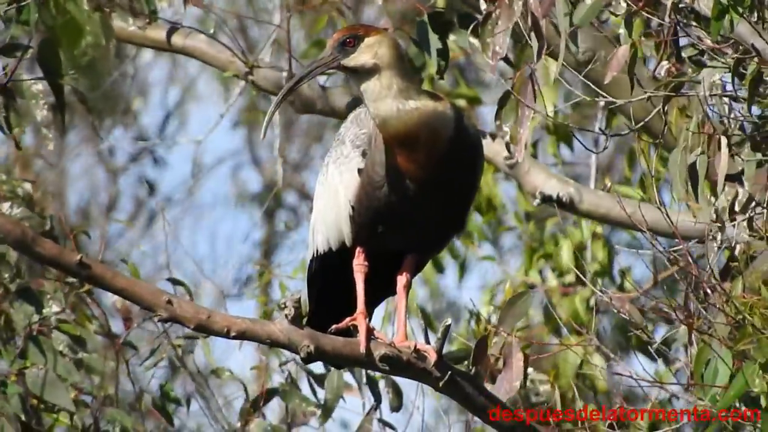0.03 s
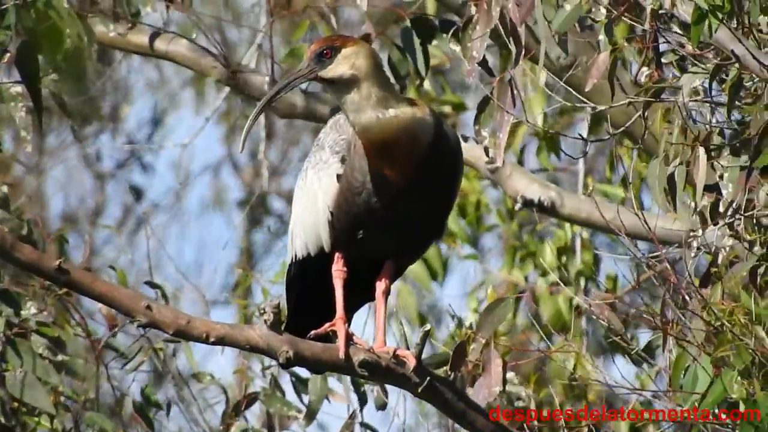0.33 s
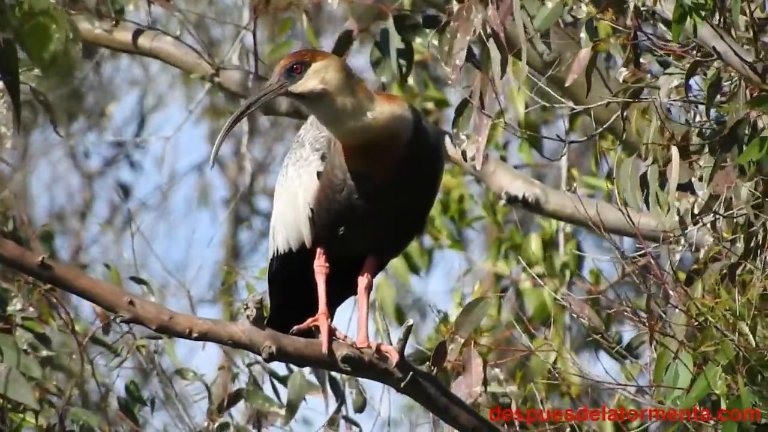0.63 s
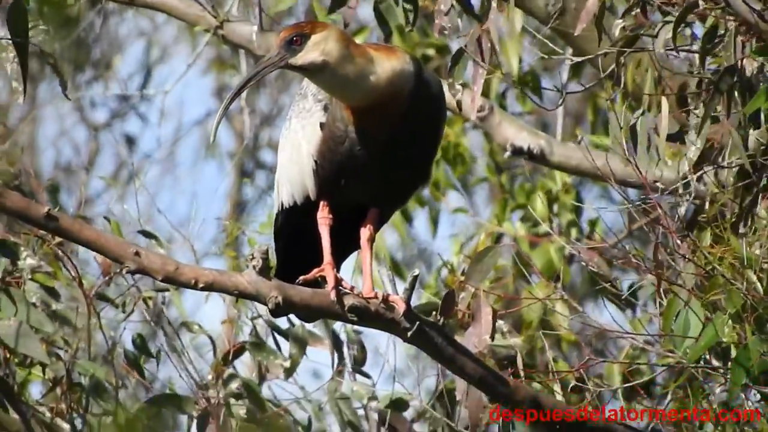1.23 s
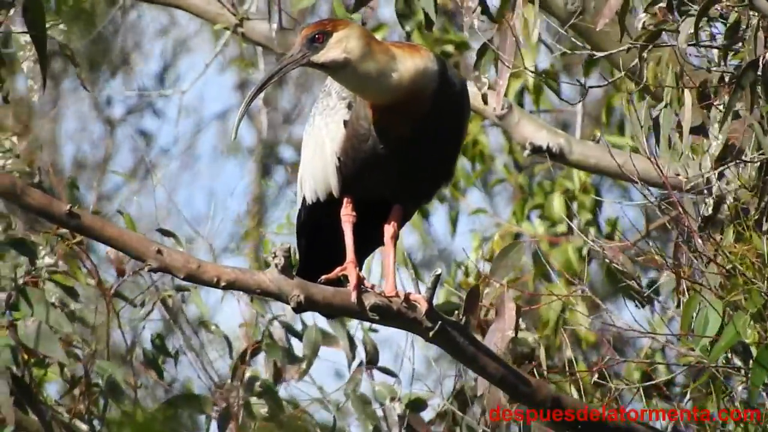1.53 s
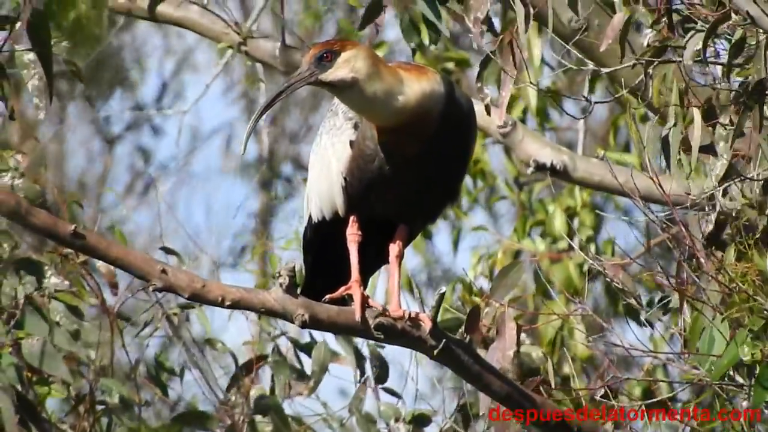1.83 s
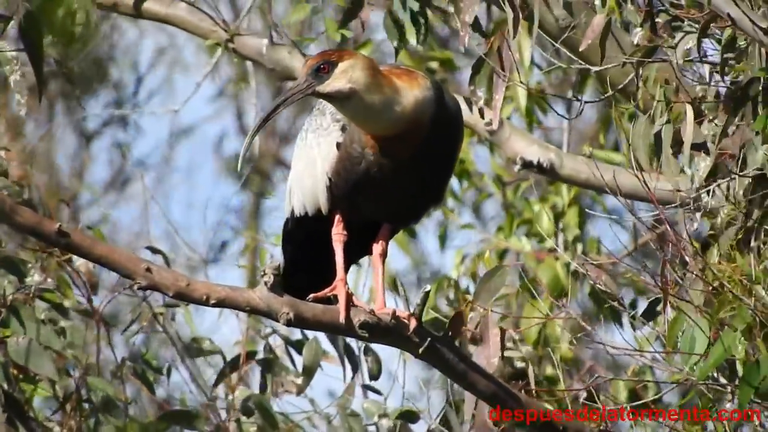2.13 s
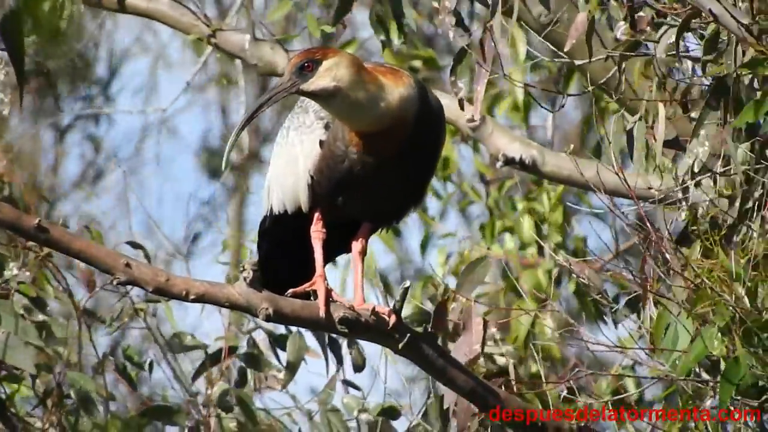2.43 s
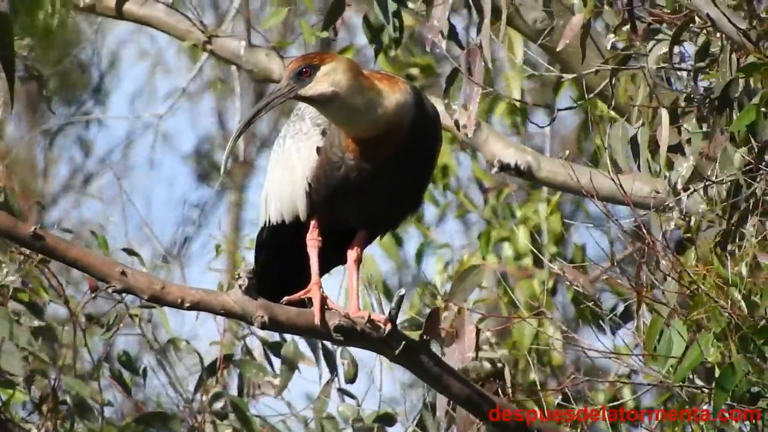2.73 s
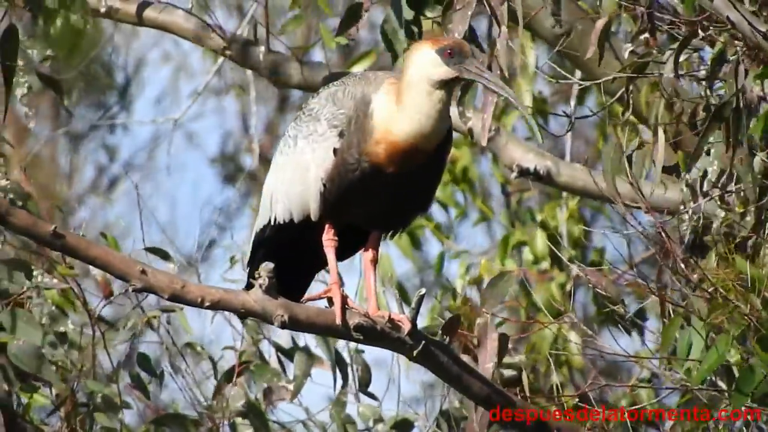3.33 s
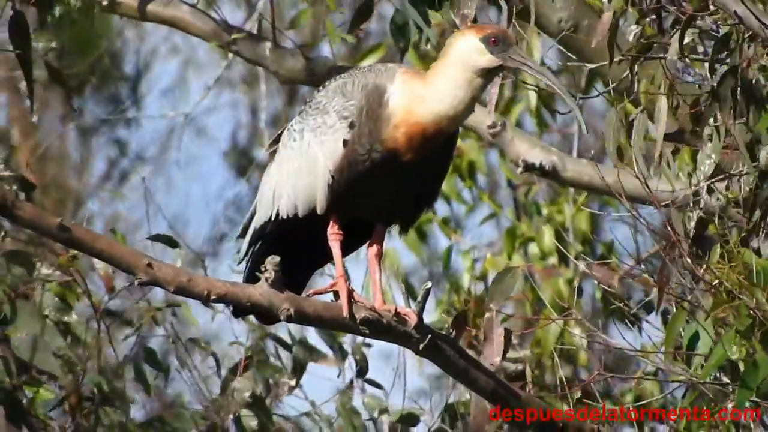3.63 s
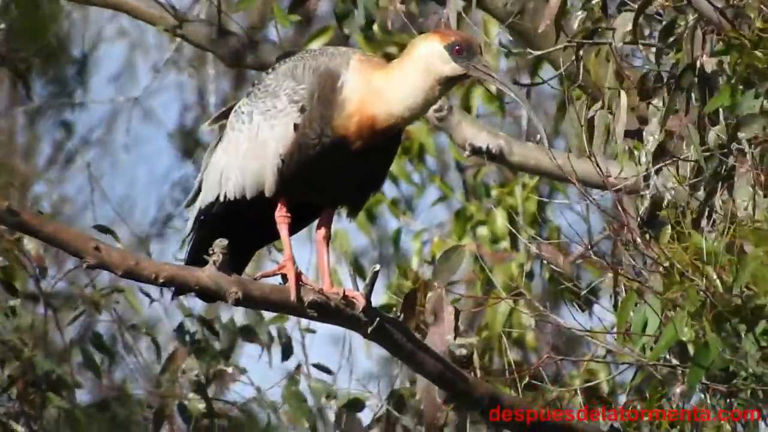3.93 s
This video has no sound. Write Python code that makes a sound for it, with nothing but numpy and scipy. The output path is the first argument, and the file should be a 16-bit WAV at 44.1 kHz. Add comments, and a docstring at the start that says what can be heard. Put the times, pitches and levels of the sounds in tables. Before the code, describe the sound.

Two ibises call harshly throughout in an echoing grove, each about four times a second. A gust bumps the microphone at the start as a small bird gives two falling whistles, then a chip near 0.9 seconds. One ibis honks hoarsely; the other grunts, then brays on two pitches from 1.6 seconds. Wind rumbles and thumps, mostly on the left, from about 2 to 3.3 seconds, then eases.

```python
"""A gust bumps the microphone as a small bird whistles twice and two ibises start calling in an
echoing grove, in turn at first, each about four times a second. One honks, hoarse and rattling, from
syrinx pulses ringing in its throat; the other warms up with grunts while the small bird adds a chip.
From 1.6 s the second ibis brays on two pitches at once, and the pair drift out of step. Gusts build,
buffeting and thumping mostly on the left, and ease towards the end."""
import sys
import numpy as np
from scipy import signal
from scipy.fft import rfft, irfft, next_fast_len
from scipy.io import wavfile
from scipy.ndimage import uniform_filter1d, minimum_filter1d, map_coordinates

SR = 44100
rng = np.random.default_rng(int(sys.argv[2]) if len(sys.argv) > 2 else 0)


def generate_wav(signal):
    """Clip the signal to [-1, 1] and save it as 16-bit WAV at the path in sys.argv[1]."""
    frames = np.transpose(np.atleast_2d(signal))
    scaled = np.clip(frames, -1, 1) * 32767
    pcm = np.round(scaled).astype(np.int16)
    wavfile.write(sys.argv[1], SR, pcm)


N = 176400
T = np.arange(SR // 6) / SR  # time within one call [s]

# First ibis, honk cues; layers are trimmed in the mix
# (time [s], length [s], rattle [dB], held part [dB], rasp [dB], pulse rate [Hz], ringing tone [Hz])
HONK_CUES = [(0.058, 0.035, -40.5, -37, -50, 277.8, 1860), (0.31, 0.033, -31.5, -28.5, -44.5, 259, 1858),
             (0.557, 0.057, -23, -28, -39.5, 267.5, 1910), (0.812, 0.055, -22, -28, -37.5, 264.6, 2004),
             (1.076, 0.064, -22, -27.5, -35.5, 274.7, 2107), (1.353, 0.064, -21, -25.5, -35, 276.5, 2100),
             (1.628, 0.056, -24.5, -36, -35.5, 276.2, 2160), (1.888, 0.058, -25, -33, -38, 274.3, 2126),
             (2.151, 0.072, -25, -35.5, -39, 274.3, 2160), (2.424, 0.074, -29, -36, -40.5, 265.3, 2170),
             (2.698, 0.091, -35, -39, -43, 277.6, 2167), (2.975, 0.067, -26.5, -40, -41.5, 281.8, 2150),
             (3.244, 0.052, -22, -49, -39.5, 280.5, 2050), (3.51, 0.059, -22, -41, -40.5, 279, 2036),
             (3.788, 0.06, -24.5, -33.5, -43.5, 269.2, 2170)]
# Second ibis, warm-up grunts (same columns as the honks)
GRUNT_CUES = [(.225, 0.042, -38, -57, -55, 253.7, 1810), (0.452, .045, -40.5, -40, -48.5, 250.6, 1875),
              (0.681, 0.048, -31.5, -35.5, -46, 264.3, 1980),
              (0.901, 0.065, -34.5, -35.5, -43.5, 266.4, 1913),
              (1.144, 0.059, -27.5, -35, -43, 265.3, 1990)]
# Second ibis, bray cues; layers are trimmed in the mix (time [s], length [s], rattle [dB], tone [dB],
# upper tone [dB], overtones [dB], rasp [dB], pitch [Hz], upper pitch [Hz])
BRAY_CUES = [(1.595, 0.067, -26, -27.5, -45, -38.5, -36, 1993, 2497),
             (1.837, 0.071, -24, -31.5, -39.5, -41, -35.5, 1988, 2499),
             (2.079, 0.07, -23.5, -29, -42, -37.5, -36.5, 1989, 2548),
             (2.316, 0.059, -29, -26.5, -37.5, -37, -51, 2025, 2557),
             (2.565, 0.096, -28, -40, -43.5, -45, -38, 1996, 2539),
             (2.829, 0.096, -35, -33, -46.5, -43.5, -36.5, 1989, 2565),
             (3.076, .084, -26.5, -36, -45.5, -39, -34, 2013, 2550),
             (3.325, 0.086, -24.5, -38, -38.5, -37.5, -31, 1909, 2495),
             (3.571, 0.077, -23, -37, -36.5, -34, -30, 1928, 2469),
             (3.811, 0.074, -23, -37.5, -36, -34.5, -33, 1916, 2417)]
# Throat resonances (frequency [Hz], gain [dB])
THROAT_EQ = [(150, -22.5), (500, -25.5), (1100, -16), (1450, -3), (1670, 3), (1800, -8.5), (1960, 7.5),
             (2080, -1.5), (2250, -2), (2500, -5.5), (2800, -22), (3400, -18), (4200, -21), (6000, -34),
             (12000, -49.5)]
# Nasal peak of the honk (frequency [Hz], gain [dB])
NASAL_EQ = [(3000, -46.5), (3700, -23), (4020, 3.5), (4230, -0.5), (4420, -11), (4800, -20), (6000, -51)]
# Bright edge of the rasp (frequency [Hz], gain [dB])
RASP_EQ = [(1500, -24), (3000, -20), (3750, -10), (4020, -1), (4250, 10), (4600, 8), (5300, 5.5),
           (5950, 16), (6900, -3), (8200, 6), (9200, -8.5), (10300, -5), (12000, -20), (15500, -84)]
# Beak colour on the bray's overtones (frequency [Hz], gain [dB])
BEAK_EQ = [(1500, -13), (3000, -32), (3500, -2), (3750, 1), (3950, 12), (4600, -30.5), (5200, -6.5),
           (5950, -0.5), (6600, -1.5), (7200, -20), (8100, -8.5), (8700, -1), (10400, -9.5), (12000, -43),
           (15500, -42)]
# Small bird, one contour per note (time [s], pitch [Hz], level [dB])
WHISTLE_CONTOURS = [
    [(.012, 4510, -64), (.035, 4570, -37), (.07, 4350, -33.5), (.115, 4154, -46), (.165, 3970, -47),
     (.228, 3726, -48), (.255, 3680, -71)],
    [(.303, 7300, -55), (.328, 6180, -38.5), (.348, 5610, -32.5), (.378, 5000, -38.5), (.415, 4630, -35),
     (.45, 4350, -42), (.465, 4240, -58)],
    [(.92, 4180, -53), (.934, 4880, -31), (.948, 4830, -48)],
]
# Stereo placement of the birds (frequency [Hz], left minus right [dB])
BIRD_PAN = [(200, 7), (700, 7.5), (1300, -4.5), (2300, -6.5), (4200, -0.5), (6000, 3), (14000, 1.5)]
# Grove reverb decay (frequency [Hz], time to fall 60 dB [s])
GROVE_DECAY = [(300, 0.13), (2000, 1), (4000, 0.87), (8000, 0.62), (14000, 0.7)]
# Grove reverb colour (frequency [Hz], gain [dB])
GROVE_EQ = [(300, 2), (1200, -3), (2000, -9), (2600, -4), (4000, -1.5), (6000, 1), (9000, 6), (14000, 2)]
# Stereo image of reverb and air (frequency [Hz], left-right correlation [0-1])
GROVE_LIKENESS = [(100, 0.9), (2000, 0.74), (4000, 0.85), (7000, 0.79), (12000, .1)]
# Gust fader and pan moves (time [s], relative level [dB], left minus right [dB])
GUST_MOVES = [(0.0, -16.5, 29), (0.03, -28, 2), (0.05, -15, 29), (0.31, -54, 7), (0.49, -52.5, 4),
              (0.97, -50, -2), (1.04, -32.5, 10), (1.11, -25, 7.5), (1.16, -28, 5), (1.51, -34.5, 40),
              (1.58, -25.5, 29), (1.63, -34.5, -13), (1.75, -41, 32), (1.78, -21.5, 20), (1.82, -27, 24),
              (1.85, -18, 25), (1.89, -18, -4.5), (2.06, -14.5, 32), (2.12, -21.5, 18), (2.27, -11, 14.5),
              (2.31, -14.5, 7), (2.43, -20, 28), (2.47, -15.5, 12), (2.6, -20.5, 21), (2.63, -11.5, 5.5),
              (2.76, -19.5, 9.5), (3.13, -27, 20), (3.15, -17.5, 26), (3.33, -27.5, 22), (3.38, -26.5, -6),
              (3.43, -32, 4), (3.66, -37, -9.5), (3.69, -49.5, 10), (3.82, -51.5, -6), (3.85, -35.5, 10),
              (3.9, -32.5, -5), (3.95, -26.5, 21), (4.0, -34.5, -9)]
# Low rumble of wind on the microphone (frequency [Hz], gain [dB])
BUFFET_EQ = [(15, -63), (25, -58), (40, -21), (60, 2), (96, 5), (170, 0), (260, -24), (470, -57),
             (1000, -60), (2200, -110)]
# Higher flutter of strong gusts (frequency [Hz], gain [dB])
FLUTTER_EQ = [(100, -3), (220, 11.5), (320, -2), (450, -16.5), (700, -27), (1100, -59), (2500, -75)]
# Hardest blows of wind (time [s], peak [dB], width [s])
THUMP_CUES = [(2.047, -15.5, 0.0015), (2.277, -9.5, 0.00074), (2.369, -8.5, 0.00079),
              (2.618, -12.5, 0.00085), (2.64, -10, 0.0011), (2.676, -12, 0.00065), (2.715, -10, .0012),
              (3.231, -6.5, 0.0013)]
# Rustle cues (time [s], length [s], level [dB])
RUSTLE_CUES = [(.44, 0.08, -37), (.61, 0.04, -39), (.668, 0.039, -39), (.72, 0.035, -39),
               (1.093, 0.13, -43.5), (1.66, 0.067, -41.5)]
# Dull colour of the rustles (frequency [Hz], gain [dB])
RUSTLE_EQ = [(70, -21), (170, 4), (260, -12.5), (400, -16.5), (750, -13), (1400, -23), (3000, -29),
             (9000, -52), (15000, -85)]
# Distant notes (time [s], length [s], pitch [Hz], level [dB])
FAR_NOTE_CUES = [(0, 0.05, 980, -53), (0, 0.05, 766, -56), (0.22, 0.062, 952, -48)]
# Bed of outdoor air (frequency [Hz], gain [dB])
AIR_EQ = [(30, 7.5), (80, 7.5), (180, 7.5), (300, -12), (600, -4.5), (1000, -9), (2000, -2), (3200, -21),
          (5000, -22.5), (9000, -25.5), (12000, -29), (15500, -40)]

RATE_RISE, RISE_S = .03, .03  # the pulses speed up as the honk opens
RING_SAG, UPPER_SAG = .045, .067  # pitch drop at the ends of a tone's arch [fraction]
PULSES_DB, RING_DB, NASAL_DB, BARK_DB = -10, -2, -1, -.5  # honk layer trims
BARK_HZ, BARK_WIDTH_HZ, BARK_FALL_S = 1920, 150, .009
RATTLE_PEAK_S, RATTLE_FALL_S, RELEASE_S = .009, .007, .022
RASP_DELAY_S, RASP_RISE_S = .014, .0066
SLIDE_UP, SLIDE_UP_S, SLIDE_DOWN, SLIDE_DOWN_S = .16, .009, .12, .017  # bray bends [fraction], [s]
TONE_RISE_S, UPPER_DELAY_S, UPPER_RISE_S = .0018, .011, .012
BRAY_RATE_HZ, YELP_DB, SLIDE_DB, SWELL_DB = 250, -3, -4, 10
BREAK_DB, BREAK_JITTER = 4.5, .009  # level and pitch flicker, scaled by roughness
CROAK_HZ, CROAK_DB, CROAK_BEFORE_S = 1797, -9.5, .022  # the throb that closes a bray
WIND_DB, BUFFET_CREST = -2, 5.7  # rumble trim; its soft ceiling [multiples of RMS]
FLUTTER_DB, STRONG_GUST_DB, FLUTTER_SWING_DB = -32.5, -16.5, 5.5
FLUTTER_GROWS = 1.6  # dB of flutter per dB of gust
WHISTLE_SEND_DB, AIR_DB, LEFT_LAG_S, TOP_HZ = -6.5, -46, 3.4e-5, 15750


def honks():
    """Honks and grunts: a bark opens, then syrinx pulses turn hoarse under an arching tone."""
    out = np.zeros(N)
    for s, length, rattle_db, held_db, rasp_db, rate, tone_hz in HONK_CUES + GRUNT_CUES:
        hz = rate * (1 + RATE_RISE * ramp(T / RISE_S) - 0.12 * ramp((T / length - .6) * 2))
        held = ramp(T / RISE_S) * ramp((length - T) / RELEASE_S + .5)
        source = syrinx(hz, jitter=0.017, rough=.12 * ramp(T / RISE_S - .3), scatter_db=3.0)
        envelope = np.hypot(amp(rattle_db + PULSES_DB) * rattle_shape(T), amp(held_db - 5.5) * held)
        throat = envelope * unit(resonate(source, THROAT_EQ))
        arch = np.clip(2 * T / length - 1, -1, 2) ** 2
        phase = phase_of(tone_hz * (1 - RING_SAG * arch + 0.0069 * wobble(374)))
        nasal = amp(rasp_db + NASAL_DB) * unit(resonate(source, NASAL_EQ))
        ring = (amp(held_db + RING_DB) * np.sin(phase) + nasal) * amp(0.17 * wobble(195))
        attack = amp(rattle_db + BARK_DB) * bark(hz)
        add(out, s, attack + throat + held * ring + amp(rasp_db) * rasp(hz, length))
    return out


def brays():
    """A throbbing tone slides up, holds while a second arches over it, and falls away in a croak."""
    out = np.zeros(N)
    for s, length, rattle_db, tone_db, upper_db, over_db, rasp_db, tone_hz, upper_hz in BRAY_CUES:
        position = 2 * T / length - 1  # -1 at the attack, +1 at the end
        arch = np.clip(position, -1, 1) ** 2
        rough = np.clip((rasp_db - tone_db + 12) / 25, .15, .7)  # more rasp, more break-up
        slide = SLIDE_UP * (1 - ramp(T / SLIDE_UP_S - .5))
        slide += SLIDE_DOWN * np.clip((T - length) / SLIDE_DOWN_S + 1, 0, 1) ** 2
        low = phase_of(tone_hz * (1 - slide + rough * BREAK_JITTER * wobble(400)))
        high = phase_of(upper_hz * (1 - UPPER_SAG * arch + rough * BREAK_JITTER * wobble(451)))
        held = ramp((T - UPPER_DELAY_S) / UPPER_RISE_S) * ramp((length - T) / RELEASE_S)
        held *= break_up(rough)

        upper = np.sqrt(2) * amp(upper_db + SWELL_DB * (.5 - np.abs(position))) * np.sin(high)
        # The overtones beat at the gap between the two pitches; mid-call the pulses reach that rate.
        overtones = sum(np.sin(k * low) for k in range(2, 7)) * np.exp(1.3 * np.cos(high - low))
        upper += amp(over_db) * unit(resonate(overtones, BEAK_EQ))
        hz = BRAY_RATE_HZ + (upper_hz - tone_hz - BRAY_RATE_HZ) * (1 - arch)
        rattle = unit(resonate(syrinx(hz, jitter=0.017, rough=.25, scatter_db=-4.5), THROAT_EQ))
        rattle *= amp(rattle_db - 6) * rattle_shape(T) + rough * amp(tone_db) * held

        gate = ramp(T / TONE_RISE_S) * ramp((length - T) / 0.033 + .5)
        yelp = amp(rattle_db + YELP_DB) * rattle_shape(T + 0.0058)
        tone = gate * np.hypot(amp(tone_db + SLIDE_DB * arch), yelp) * np.sin(low) * break_up(rough)
        croak = amp(rattle_db + CROAK_DB) * rattle_shape(T - length + CROAK_BEFORE_S)
        croak *= np.sin(2 * np.pi * CROAK_HZ * T)
        throb = 1 + 0.14 * arch * np.cos(2 * np.pi * BRAY_RATE_HZ * T)
        lower = np.sqrt(2) * throb * (tone + croak)
        add(out, s, lower + held * upper + rattle + amp(rasp_db - 10) * rasp(hz, length))
    return out


def syrinx(hz, jitter, rough, scatter_db):
    """Uneven voice pulses with a puff of noise each cycle; rough is the puffs' share of the power."""
    cycles = np.cumsum(hz * (1 + jitter * wobble(250))) / SR
    clicks = np.diff(np.floor(cycles), prepend=-1) * amp(scatter_db * wobble(287.5))
    puffs = rng.standard_normal(len(T)) * np.exp(-2.5 * (cycles % 1))
    return np.sqrt(1 - rough) * unit(clicks) + np.sqrt(rough) * unit(puffs)


def bark(hz):
    """The honk's attack: a few clean pulses under one throat resonance."""
    k = np.arange(4, 13)[:, None]
    harmonics = np.cos(k * phase_of(hz)) / np.cosh((k * hz - BARK_HZ) / BARK_WIDTH_HZ)
    envelope = np.sqrt(ramp(T / 0.016)) * np.exp(-np.maximum(T - .014, 0) / BARK_FALL_S)
    return envelope * unit(harmonics.sum(axis=0))


def rasp(hz, length):
    """Harsh treble pulses that open once the call is under way."""
    envelope = ramp((T - RASP_DELAY_S) / RASP_RISE_S) * ramp((length - T) / RELEASE_S + .5)
    return envelope * unit(resonate(syrinx(hz, jitter=.007, rough=.15, scatter_db=5.5), RASP_EQ))


def rattle_shape(t):
    """An envelope that swells and dies within a few pulses."""
    attack = ramp(0.36 + 0.37 * t / RATTLE_PEAK_S) * (t >= 0)
    return attack * np.exp(-np.maximum(t - RATTLE_PEAK_S - .003, 0) / RATTLE_FALL_S)


def break_up(rough):
    """Fast random dips in gain that fray a tone."""
    return amp(rough * BREAK_DB * (wobble(167.5) - 1.23))


def whistles():
    """The small bird: two falling whistles and a chip, almost pure sines."""
    out, t = np.zeros(N), np.arange(N) / SR
    for rows in WHISTLE_CONTOURS:
        hz, db = curves(rows)
        phase = phase_of(hz * (1 + 0.0054 * wobble(145.4, size=N)))
        gate = (t > rows[0][0]) * (t < rows[-1][0])
        out += gate * amp(db) * (np.sin(phase) + amp(-41) * np.sin(2 * phase))
    return np.sqrt(2) * out


def grove(x):
    """Trunks and leaves scatter the calls back; each half second gets its own reverb tail."""
    out = np.zeros((2, N))
    for start in range(0, N, SR // 2):
        hz, t, spectrum = signal.stft(stereo_noise(SR), SR, nperseg=256)
        decay = amp(-60 * t / along(GROVE_DECAY, hz)[:, None])
        decay *= ramp(t / 0.0027) * (1 + 0.2 * np.exp(-t / 0.0071))  # soft onset, early lift
        energy = SR * np.mean(decay ** 2, axis=1, keepdims=True)
        decay *= amp(along(GROVE_EQ, hz))[:, None] / np.sqrt(energy)
        for side, tail in zip(out, signal.istft(spectrum * decay, SR, nperseg=256)[1]):
            add(side, start / SR, signal.fftconvolve(x[start:start + SR // 2], tail))
    return out


def wind():
    """Gusts buffet each microphone port separately; strong ones flutter, the hardest thump the left."""
    db, pan_db = curves(GUST_MOVES)
    buffet = coloured(rng.standard_normal((2, N)), BUFFET_EQ)
    buffet = BUFFET_CREST * np.tanh(buffet / BUFFET_CREST) * amp(db + WIND_DB)
    flutter = coloured(rng.standard_normal((2, N)), FLUTTER_EQ)
    swing_db = FLUTTER_SWING_DB * wobble(45, size=N)
    flutter *= amp(FLUTTER_DB + FLUTTER_GROWS * (db - STRONG_GUST_DB) + swing_db)
    sides = amp(np.array([pan_db, -pan_db]) / 2)
    out = (buffet + flutter) * 2 * sides / np.linalg.norm(sides, axis=0)
    for s, thump_db, width in THUMP_CUES:
        u = ((np.arange(N) / SR - s) / width) ** 2
        out[0] -= amp(thump_db) * (1 - u) * np.exp(-u / 2)
    return out


def rustles():
    """Short, dull bursts of grainy noise."""
    out = np.zeros(N)
    for s, length, db in RUSTLE_CUES:
        grain = rng.standard_normal(len(T)) * amp(2.6 * wobble(76))
        envelope = ramp(T / 0.0025) * ramp((length - T) / 0.029 + 0.4)
        add(out, s, amp(db) * envelope * unit(resonate(grain, RUSTLE_EQ)))
    return out


def far_notes():
    """Faint, far notes: wavering sines with soft edges."""
    out = np.zeros(N)
    for s, length, hz, db in FAR_NOTE_CUES:
        tone = np.sqrt(2) * np.sin(phase_of(hz * (1 + 0.024 * wobble(113))))
        add(out, s, amp(db) * ramp(np.minimum(T, length - T) / 0.011) * tone)
    return out


def air():
    """A steady, bass-heavy bed of outdoor noise."""
    return amp(AIR_DB) * coloured(stereo_noise(N), AIR_EQ)


def amp(db):
    """Decibels to gain."""
    return 10 ** (np.asarray(db) / 20)


def unit(x):
    """Normalise to an RMS of 1."""
    return x / np.sqrt(np.mean(x ** 2) + 1e-20)


def phase_of(hz):
    """Running phase [rad] of a moving pitch."""
    return 2 * np.pi * np.cumsum(hz) / SR


def along(points, hz):
    """Read (frequency, value) points on a log frequency axis."""
    f, v = np.transpose(points)
    return np.interp(np.log(hz + 1), np.log(f + 1), v)


def curves(rows):
    """An automation curve for each column after the time."""
    s, *cols = np.transpose(rows)
    return [np.interp(np.arange(N) / SR, s, c) for c in cols]


def wobble(rate, size=len(T)):
    """A smooth random curve, rate knots a second."""
    return map_coordinates(rng.standard_normal(size // 8), [np.arange(size) * rate / SR], mode='wrap')


def ramp(u):
    """A smooth fade from 0 to 1."""
    return np.sin(np.pi / 2 * np.clip(u, 0, 1)) ** 2


def filtered(x, response):
    """Filter x by a function of frequency, to the scene's length."""
    m = next_fast_len(N + SR // 2)
    return irfft(rfft(x, m) * response(np.fft.rfftfreq(m, 1 / SR)), m)[..., :N]


def coloured(noise, eq):
    """Noise through an EQ curve, normalised."""
    return unit(filtered(noise, lambda hz: amp(along(eq, hz))))


def resonate(x, eq):
    """Ring x through a minimum-phase EQ of unit energy."""
    m = len(T) // 2 * 2
    cepstrum = irfft(np.log(amp(along(eq, np.fft.rfftfreq(m, 1 / SR)))))
    cepstrum[1:m // 2] *= 2
    cepstrum[m // 2 + 1:] = 0
    impulse = irfft(np.exp(rfft(cepstrum)))
    return signal.fftconvolve(x, impulse / np.linalg.norm(impulse))[:len(x)]


def stereo_noise(size):
    """Mid and side noise blended to the grove's stereo width."""
    def blend(hz):
        angle = np.arccos(along(GROVE_LIKENESS, hz)) / 2
        return np.array([np.cos(angle), np.sin(angle)])
    mid, side = filtered(rng.standard_normal((2, size)), blend)[:, :size]
    return np.array([mid + side, mid - side])


def add(track, s, sound):
    """Mix a sound in at time s."""
    part = track[max(round(s * SR), 0):][:len(sound)]
    part += sound[:len(part)]


def scene():
    """Pan the birds and their reverb, then lay in the background and the wind."""
    ibises, small_bird = honks() + brays(), whistles()
    birds = ibises + small_bird + grove(ibises + amp(WHISTLE_SEND_DB) * small_bird)
    side = np.array([[.5], [-.5]])
    pan = lambda hz: amp(side * along(BIRD_PAN, hz)) * np.exp(-2j * np.pi * hz * LEFT_LAG_S * side)
    return filtered(birds, pan) + air() + rustles() + far_notes() + wind()


def record(dry):
    """A limiter ducks the hardest gusts, and a brick-wall low-pass trims the top."""
    needed = minimum_filter1d(np.minimum(1, 1 / np.abs(dry).max(axis=0)), size=300)
    return filtered(dry * uniform_filter1d(needed, size=300), lambda hz: hz < TOP_HZ)


dry = scene()
out = record(dry)
generate_wav(out)
```